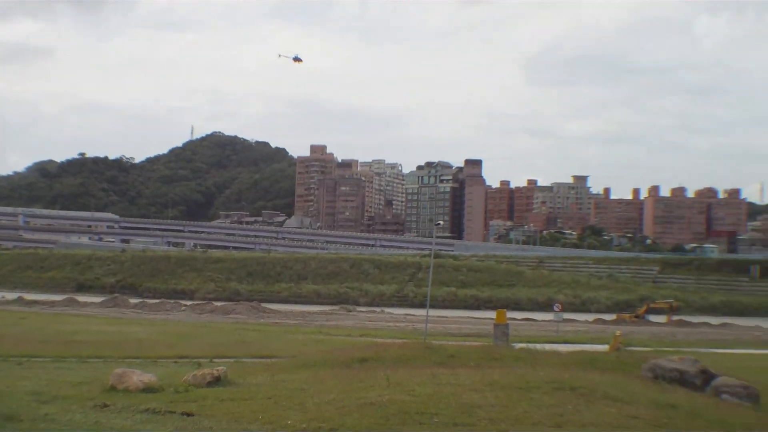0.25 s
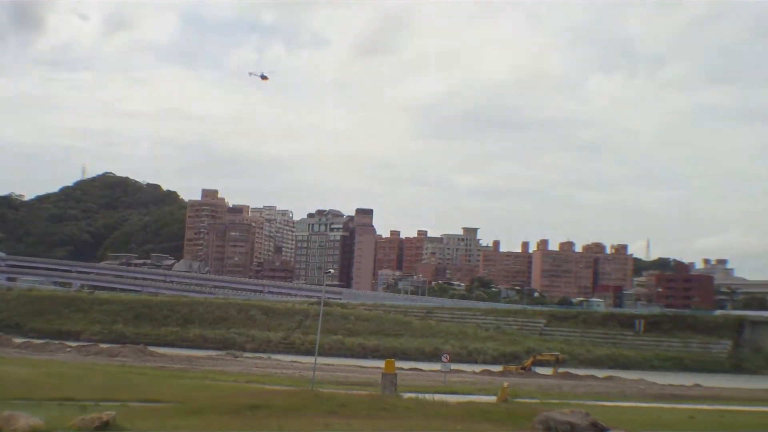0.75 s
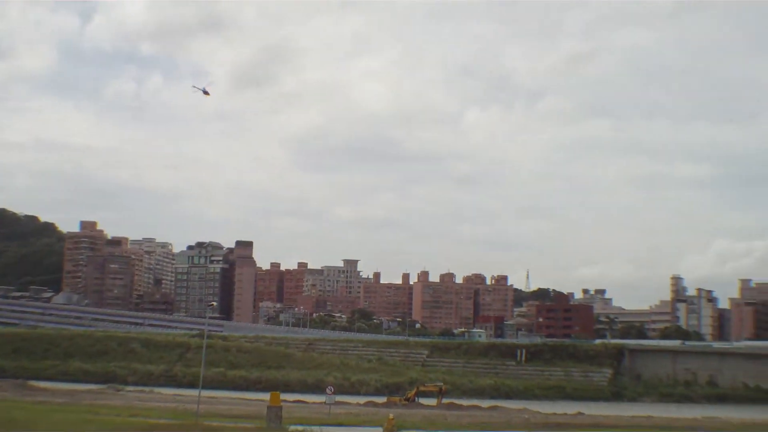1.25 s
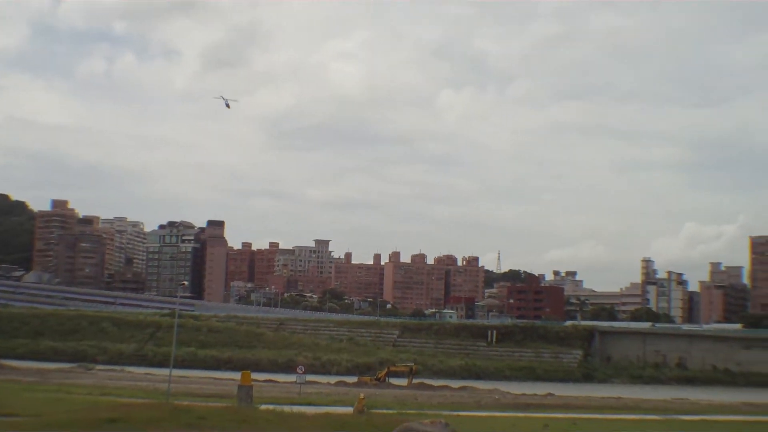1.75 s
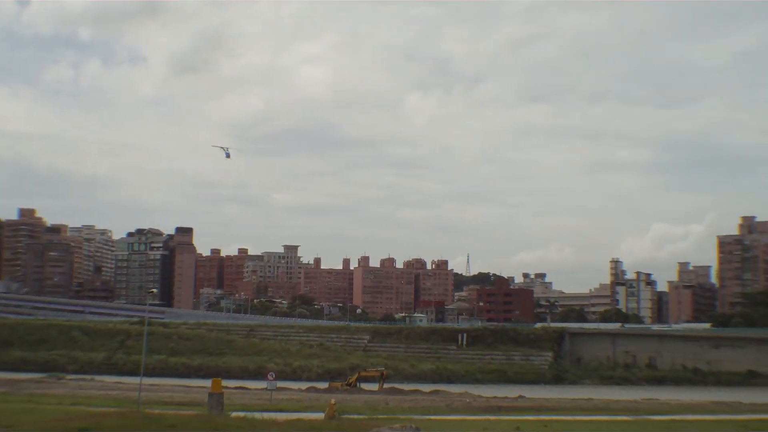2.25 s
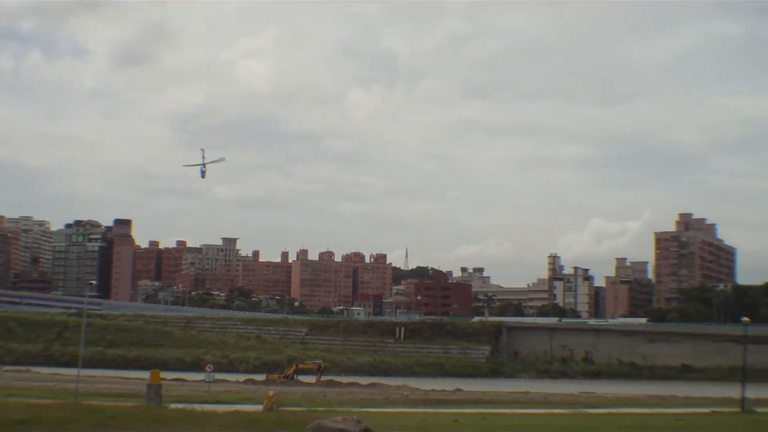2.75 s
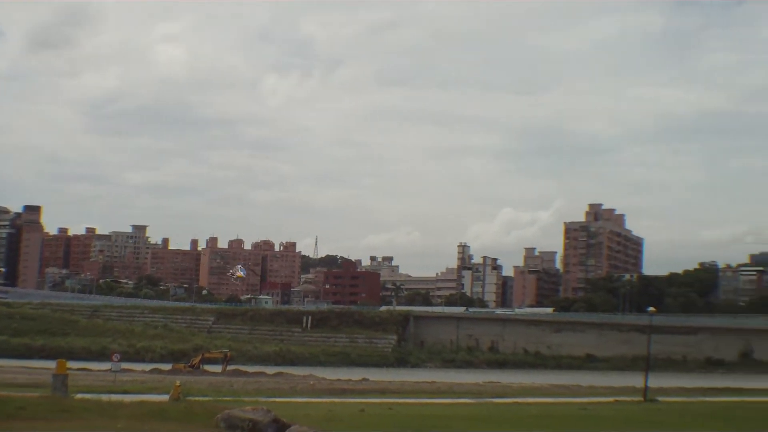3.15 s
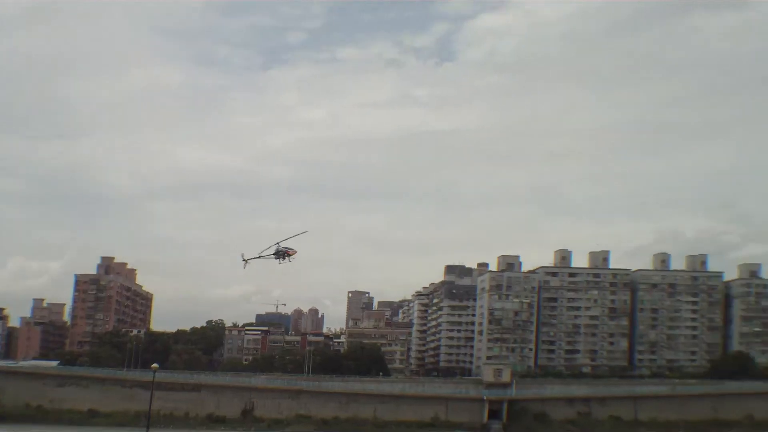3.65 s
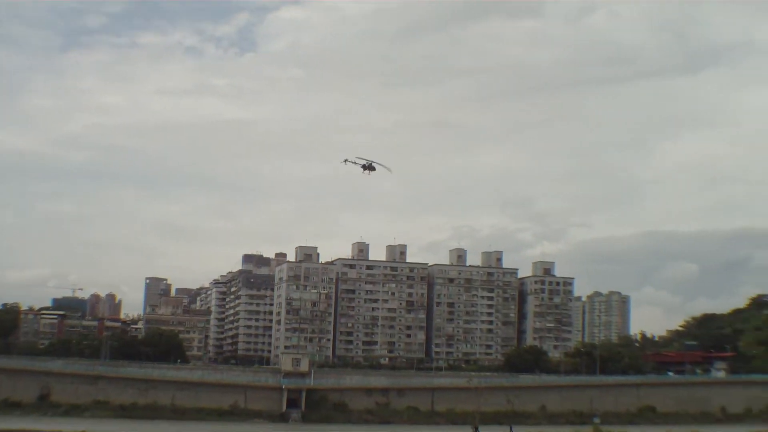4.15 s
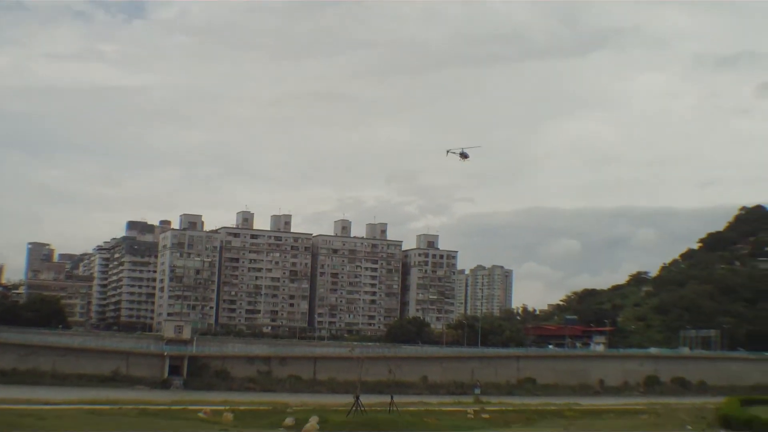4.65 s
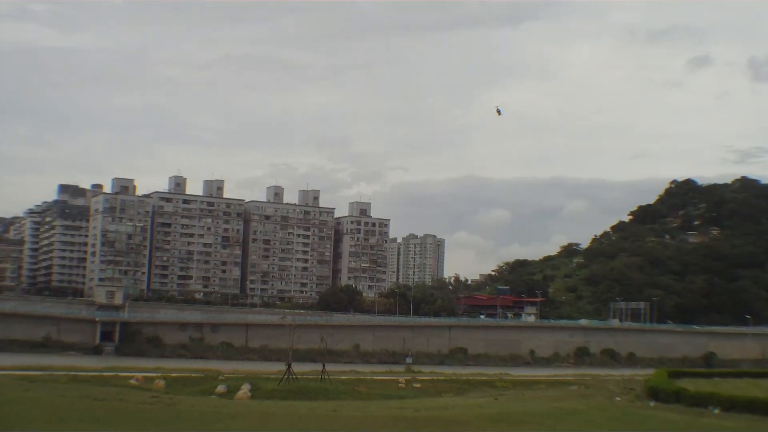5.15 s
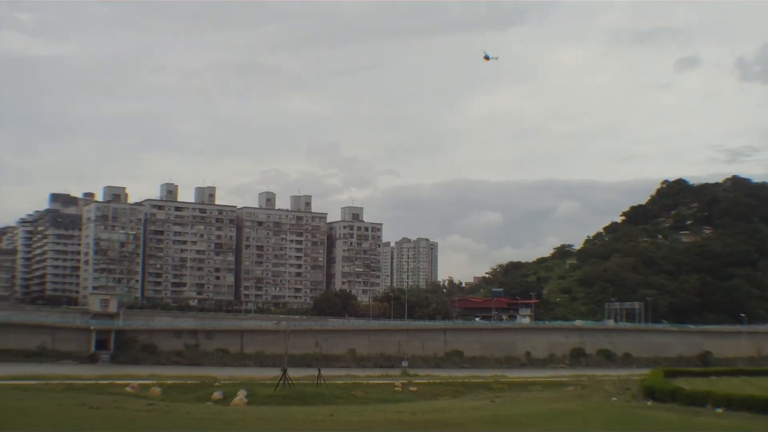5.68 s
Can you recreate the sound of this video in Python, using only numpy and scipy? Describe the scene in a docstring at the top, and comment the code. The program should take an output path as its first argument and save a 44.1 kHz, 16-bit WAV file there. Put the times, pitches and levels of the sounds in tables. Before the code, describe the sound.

A piercing, slightly fluttering gear whine with fast blade hiss comes from a model helicopter, over a soft distant traffic wash and low breeze. The pitch wavers, then drops during a close, louder pass and climbs again as the model recedes. From that pass on, wind buffets the bare camera microphone in rough bursts and slaps, close to distortion, while the town background sinks away. The sound is mono.

```python
"""Riverside park, hand-held camera: a small electric model helicopter approaches, gear whine over rotor hiss.
A breeze rumbles lightly at the single microphone, with the murmur of a town and the camera's own whirr behind.
At about 3.5 s the model swoops past close by, and its whine bends down, then up again as it climbs away.
From the swoop on, strong gusts and sharp slaps buffet the microphone, driving it towards overload.
Late on, the town sinks away. Tones make the whine and hum; shaped noise makes hiss, town, whirr and wind."""
import sys
import numpy as np
from scipy import signal
from scipy.fft import rfft, irfft, next_fast_len
from scipy.io import wavfile
from scipy.ndimage import uniform_filter1d

SR = 44100
rng = np.random.default_rng(int(sys.argv[2]) if len(sys.argv) > 2 else 0)


def inscribe(sig):
    """Save sig as 16-bit PCM at rate SR to the path in sys.argv[1].

    A 1-D sig is mono; a 2-D sig holds one channel per row.
    Samples are clipped to [-1, 1] before scaling.
    """
    pcm = np.round(np.clip(np.atleast_2d(sig).T, -1, 1) * 32767)
    wavfile.write(sys.argv[1], SR, pcm.astype(np.int16))


N = 261072  # length [samples]

# buffeting in gusts, spectrum before scaling: (frequency [Hz], relative level [dB per Hz])
BUFFET_SPECTRUM = [(60, -4), (200, 1.5), (300, 2.5), (500, 1), (800, -3), (1300, -7.5), (1700, -14),
                   (2300, -30), (3200, -58), (6000, -92)]
# rasp of the sharpest wind, spectrum before scaling: (frequency [Hz], relative level [dB per Hz])
RASP_SPECTRUM = [(400, -13), (1200, 1.5), (1900, 3), (2500, -5.5), (3500, -10.5), (4800, -21.5),
                 (8000, -30), (15500, -54)]
# closest pass, time scale of turning tail-on, half-length of the close sound [s]
PASS_S, TURN_S, SWOOP_WIDTH_S = 3.53, 0.25, 0.19


def helicopter():
    """One motor drives gears and rotor, so whine and blade rate bend together; the whine is loudest close by."""
    # gear whine as heard, bent by load and Doppler shift: (time [s], pitch [Hz])
    whine = [(0, 7650), (.75, 7800), (1.9, 8110), (2.27, 8040), (2.6, 7700), (2.92, 8240), (3.25, 7330),
             (3.42, 6950), (3.75, 6390), (3.96, 6780), (4.12, 7220), (4.55, 7470), (4.9, 7830),
             (5.92, 7890)]
    whine_per_blade = 68  # gear cycles for each passing blade
    front_db, behind_db, close_db = -50, -53, -36.5
    lag_s, close_width_s = 0.19, 0.19  # the loudest whine trails the closest pass
    hz, = curves(whine)
    hz = uniform_filter1d(hz, size=SR // 12, mode="nearest")  # inertia rounds every bend
    blade = phase_of(hz / whine_per_blade)
    far = undb(front_db + (behind_db - front_db) * tail_on())
    close = undb(close_db) * np.sqrt(swell(PASS_S + lag_s, close_width_s))
    return gears(hz, np.hypot(far, close), blade) + rotor(blade)


def gears(hz, gain, blade, wobble=0.00196, flutter_db=2.5, chop=0.14, side_rough=0.49,
          grain_rate_hz=560, fade_db=3.0):
    """Gear mesh with sidebands; uneven teeth smear part of each tone, and moving air makes it flutter and fade."""
    # partials of the drive: (multiple of the whine [ratio], level [dB], roughness [0-1])
    partials = [(1, 3, 0.13), (1.19, -12, .4), (.72, -13, 0.1), (2, -16, .95)]
    motor_per_whine = 1 / 19.5  # motor turns for each gear cycle
    mesh = phase_of(hz * (1 + wobble * walk(210)))
    # one motor turn either side: the lower stands out from behind, the upper close by
    lower_db = -5 + 2 * tail_on()
    upper_db = -11 + 11 * swell(PASS_S, SWOOP_WIDTH_S)
    sidebands = [
        (1 - motor_per_whine, lower_db, side_rough / 2),
        (1 + motor_per_whine, upper_db, side_rough),
    ]
    tones = 0
    for multiple, db, rough in [*partials, *sidebands]:
        rough = np.clip(rough, 0, 1)
        smear = walk(grain_rate_hz) + 1j * walk(grain_rate_hz)
        grain = np.sqrt(1 - rough) + np.sqrt(rough / 2) * smear
        drift_db = flutter_db * walk(22.4) + fade_db * walk(4.1)
        tone = np.real(grain * np.exp(1j * multiple * mesh))
        tones = tones + undb(db + drift_db) * tone
    return tones * gain * (1 + chop * np.cos(blade))


def rotor(blade, swish_db=0.5, swoop_db=0, close_swish_db=2, rush_width_s=1, uneven_db=0.9, flutter_db=0.8):
    """Hiss that swells with every blade, every other one louder; its colour turns as the model passes."""
    # hiss at a distance along the flight: (time [s], level [dB])
    flight = [(0, 0.5), (1.4, -0.5), (1.8, -1.5), (2.6, 0.5), (3.1, -2.5), (4.3, 2.5), (5.92, -0.5)]
    # hiss from the front: (frequency [Hz], level [dB per Hz])
    hiss_front = [(2500, -96), (4700, -79.5), (5300, -78), (5800, -74), (6290, -76), (6680, -87.5),
                  (7180, -72), (8020, -72), (8900, -85.5), (9600, -83.5), (10700, -92), (11400, -92.5),
                  (12400, -97), (15500, -102)]
    # hiss from behind: (frequency [Hz], level [dB per Hz])
    hiss_rear = [(2500, -92), (5000, -82.5), (5700, -72.5), (6400, -79), (7200, -75.5), (8100, -76),
                 (8650, -84), (9100, -79.5), (10000, -83.5), (10700, -90), (11400, -90), (12300, -95),
                 (13600, -94), (15500, -99)]
    # hiss from close by: (frequency [Hz], level [dB per Hz])
    hiss_close = [(2500, -77), (4800, -77), (5400, -71), (5900, -68), (6550, -81), (7300, -63.5),
                  (7750, -69), (8250, -67), (9500, -81.5), (10700, -87.5), (11500, -82), (12400, -86),
                  (13600, -89), (15500, -96)]
    # lower rush of air off the blades, heard further off than the close hiss: (frequency [Hz], level [dB per Hz])
    rush_spectrum = [(1500, -94), (2300, -85.5), (2900, -78), (3500, -79), (5000, -95)]
    level_db, = curves(flight)
    behind = tail_on()
    far = np.sqrt(1 - behind) * noise(hiss_front) + np.sqrt(behind) * noise(hiss_rear)
    far = far * undb(level_db + swish_db * np.cos(blade))
    close = noise(hiss_close) * np.sqrt(swell(PASS_S, SWOOP_WIDTH_S))
    close = close * undb(swoop_db + close_swish_db * np.cos(blade))
    rush = noise(rush_spectrum) * np.sqrt(swell(PASS_S, rush_width_s))
    return (far + close + rush) * undb(uneven_db * np.cos(blade / 2) + flutter_db * walk(48))


def tail_on():
    """Share of the model heard from behind: near 0 on the approach, near 1 once it has passed."""
    return .5 + .5 * np.tanh((np.arange(N) / SR - PASS_S) / (2 * TURN_S))


def wind(sway_db=-28.0, sway_growth=0.14, rumble_db=-16.0, rumble_growth=.47, buffet_db=0.0, rasp_db=-16,
         strong_db=-15, rasp_growth=1.38, eddy_db=1.6, burst_db=6.0, flurry_db=0.84):
    """Eddies hit the microphone port: always a rumble, buffeting in gusts, short rasping bursts at their height."""
    # deep sway of the largest eddies, before scaling: (frequency [Hz], relative level [dB per Hz])
    sway_spectrum = [(5, -12), (15, 3), (26, -7), (40, -10), (60, -18), (200, -31)]
    # wind rumble, before scaling: (frequency [Hz], relative level [dB per Hz])
    rumble_spectrum = [(15, -9), (48, -1), (80, 2), (160, 0.5), (280, -2), (420, -11.5), (800, -21.5),
                       (2000, -84)]
    force_db = wind_force() + flurry_db * walk(18)
    over_strong_db = force_db - strong_db
    eddies_db = eddy_db * walk(90)
    # faster air moves the energy upward, so sway and rumble grow less than the rest
    sway = unit(noise(sway_spectrum)) * undb(sway_db + sway_growth * over_strong_db)
    rumble = unit(noise(rumble_spectrum)) * undb(rumble_db + rumble_growth * over_strong_db)
    buffet = unit(noise(BUFFET_SPECTRUM) * undb(eddies_db)) * undb(force_db + buffet_db)
    # the flow tears off for a millisecond or two at a time; this grows faster than the gust itself
    bursts = undb(eddies_db + burst_db * walk(720))
    rasp = unit(noise(RASP_SPECTRUM) * bursts)
    rasp = rasp * undb(strong_db + rasp_db + rasp_growth * over_strong_db)
    return sway + rumble + buffet + rasp


def wind_force():
    """Strength of the wind in dB: every gust swells and dies away on top of the steady flow."""
    # flow under the gusts, a breeze that freshens at the swoop: (time [s], buffeting level [dB])
    breeze = [(0, -33), (2.2, -32.5), (3.42, -28.5), (3.5, -19), (4.6, -18), (5.92, -18)]
    # gusts on top of it: (time of the peak [s], buffeting level [dB], half-length [s])
    gusts = [(0.133, -28, 0.027), (0.47, -29.5, 0.066), (1.156, -27.5, 0.044), (1.606, -30.5, 0.14),
             (1.957, -27.5, 0.051), (3.055, -33.5, 0.075), (3.716, -12.5, 0.073), (4.099, -13, 0.051),
             (4.373, -15, 0.04), (4.856, -16.5, 0.03), (5.156, -15, 0.062), (5.352, -12.5, 0.05),
             (5.423, -15.5, 0.015), (5.61, -19, 0.075)]
    steady_db, = curves(breeze)
    power = undb(steady_db) ** 2
    for peak_s, db, width_s in gusts:
        power = power + undb(db) ** 2 * swell(peak_s, width_s)
    return 10 * np.log10(power)


def slaps(level_db=-6, body_db=-1, rise_s=0.00081):
    """The sharpest eddies of the gusts: a few milliseconds of rasp with a dull body."""
    # single slaps of wind: (time of onset [s], relative level [dB])
    slap_times = [(3.658, -9), (3.682, -9), (3.701, -7), (3.9956, -13), (4.108, -17), (4.132, -11),
                  (4.31, -10), (4.331, -11), (4.356, -7), (5.349, -7), (5.887, -18)]
    envelope = np.zeros(N)
    for onset_s, db in slap_times:
        age = np.clip((np.arange(N) / SR - onset_s) / rise_s, 0, 20)  # in rise times
        envelope += undb(db + level_db) * age * np.exp(1 - age)
    return envelope * (unit(noise(RASP_SPECTRUM)) + undb(body_db) * unit(noise(BUFFET_SPECTRUM)))


def background(waver=0.00415, waver_db=2.5, whirr_db=1.5, flicker_db=0.56):
    """The wash of the town; the camera's whirr throbs slightly with its drive, over a wavering hum."""
    # distant traffic, before the level curve: (frequency [Hz], level [dB per Hz])
    town_spectrum = [(20, -65), (200, -65.5), (550, -69), (800, -60.5), (1050, -63.5), (1300, -58.5),
                     (1620, -57), (1900, -61), (2130, -70), (2450, -85.5), (4000, -100), (15000, -135)]
    # town and hum over time: (time [s], level [dB])
    background_level = [(0, 1), (3.4, 0.5), (3.9, -1.5), (4.6, -15), (5.92, -15)]
    # hum of the camera's drive, before waver and level curve: (frequency [Hz], level [dB rms])
    hum_tones = [(74.4, -33), (148.8, -34.5), (261.2, -38.5), (1768, -42.5)]
    # thin whirr of the camera: (frequency [Hz], level [dB per Hz])
    whirr_spectrum = [(1500, -102), (2500, -87), (3050, -77.5), (3450, -75), (3930, -68), (4200, -74),
                      (4550, -88.5), (7000, -90), (15500, -118)]
    level_db, = curves(background_level)
    town = noise(town_spectrum) * undb(flicker_db * walk(30))
    drive = phase_of(np.full(N, hum_tones[0][0]))
    whirr = noise(whirr_spectrum) * undb(whirr_db * np.cos(drive))
    hum = 0
    for hz, db in hum_tones:
        gain = undb(db + waver_db * walk(9))
        hum = hum + gain * np.sin(phase_of(hz * (1 + waver * walk(47.3))))
    return (town + np.sqrt(2) * hum) * undb(level_db) + whirr


def undb(db):
    """Decibels to gain."""
    return 10 ** (np.asarray(db) / 20)


def curves(table):
    """Each column of a table of (time [s], values), joined by straight lines, one value a sample."""
    s, *columns = np.transpose(table)
    return [np.interp(np.arange(N) / SR, s, c) for c in columns]


def unit(x):
    """Scale to rms 1."""
    return x / np.sqrt(np.mean(x ** 2))


def noise(spectrum):
    """Noise with a spectrum of (Hz, dB per Hz), silent above its last point."""
    hz, db = np.transpose(spectrum)
    size = next_fast_len(N, real=True)
    bins = np.maximum(np.fft.rfftfreq(size, 1 / SR), 1)
    gain = undb(np.interp(np.log(bins), np.log(hz), db, right=-np.inf))
    shaped = irfft(rfft(rng.standard_normal(size)) * gain, size)
    return shaped[:N] * np.sqrt(SR / 2)


def walk(rate):
    """Smooth chance of rms 1 that changes about rate times a second."""
    knots = np.arange(N) * (4 * rate / SR)
    bell = signal.windows.gaussian(9, np.sqrt(2))
    smooth = np.convolve(rng.standard_normal(N // 8), bell, "valid")
    return unit(np.interp(knots, np.arange(len(smooth)), smooth))


def phase_of(hz):
    """Running angle of something that turns hz times a second."""
    return 2 * np.pi * np.cumsum(hz) / SR


def swell(peak_s, width_s):
    """A bell-shaped rise and fall of power, 1 at its peak."""
    return np.exp(-.5 * ((np.arange(N) / SR - peak_s) / width_s) ** 2)


def scene():
    """Everything reaches one microphone, which feeds both channels."""
    mono = helicopter() + wind() + slaps() + background()
    return np.array([mono, mono])


def record(dry):
    """Whatever exceeds full scale clips; a steep low-pass then cuts the top."""
    top_hz = 14950
    clipped = np.clip(dry, -1, 1)
    low_pass = signal.ellip(10, .1, 80, top_hz, fs=SR, output="sos")
    return signal.sosfilt(low_pass, clipped)


dry = scene()
out = record(dry)
inscribe(out)
```